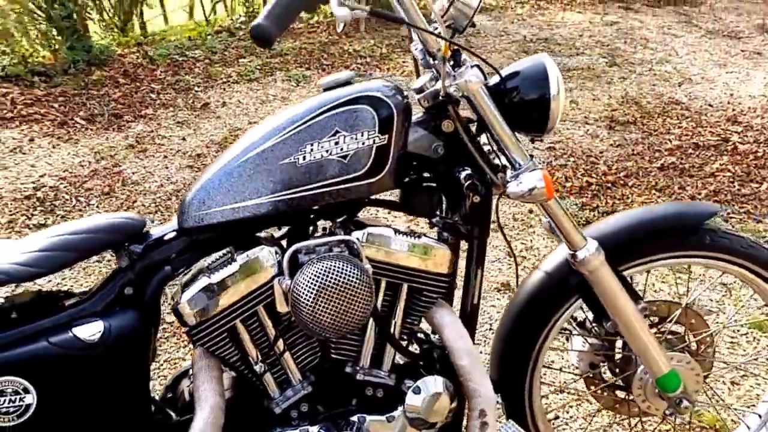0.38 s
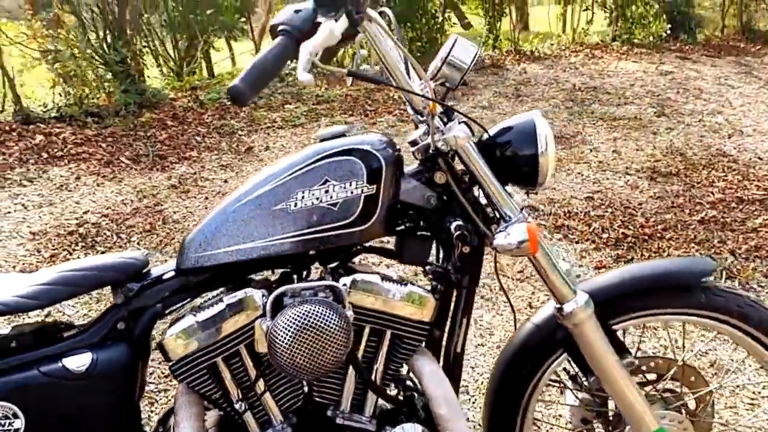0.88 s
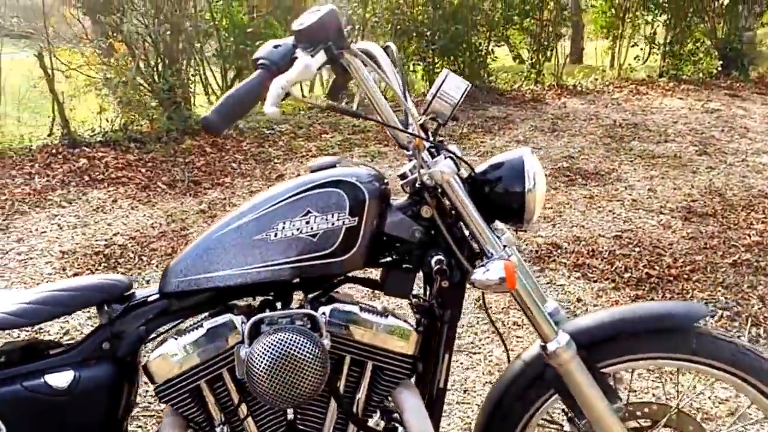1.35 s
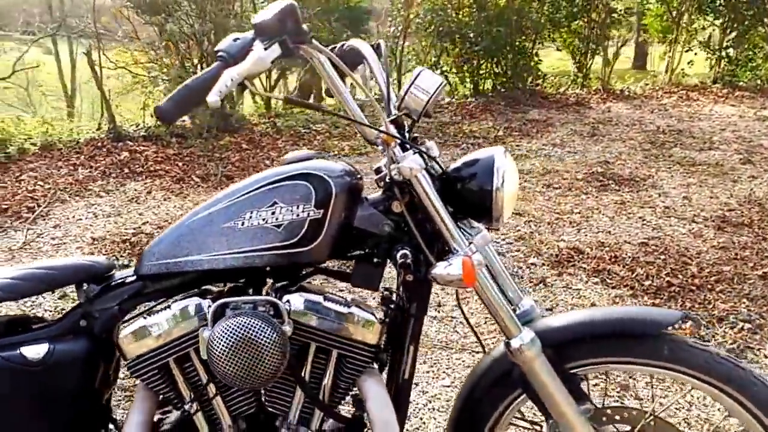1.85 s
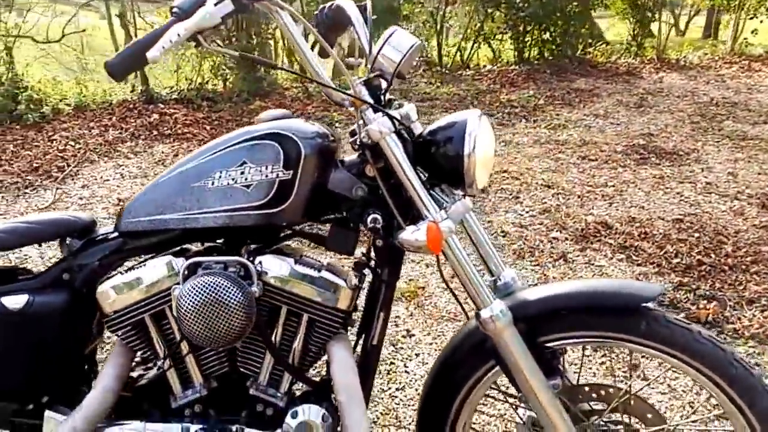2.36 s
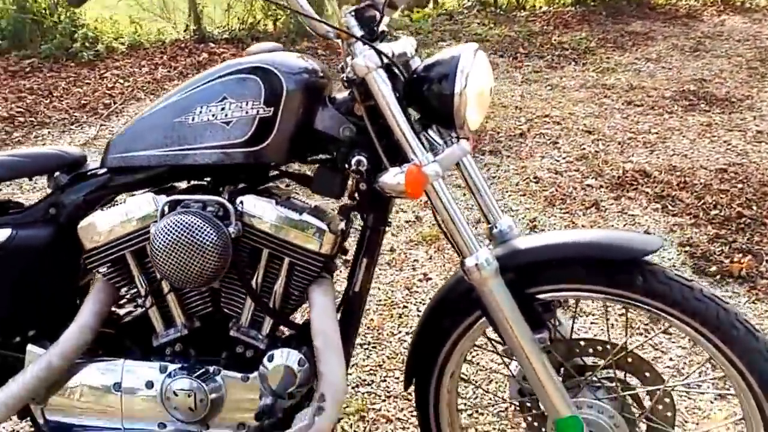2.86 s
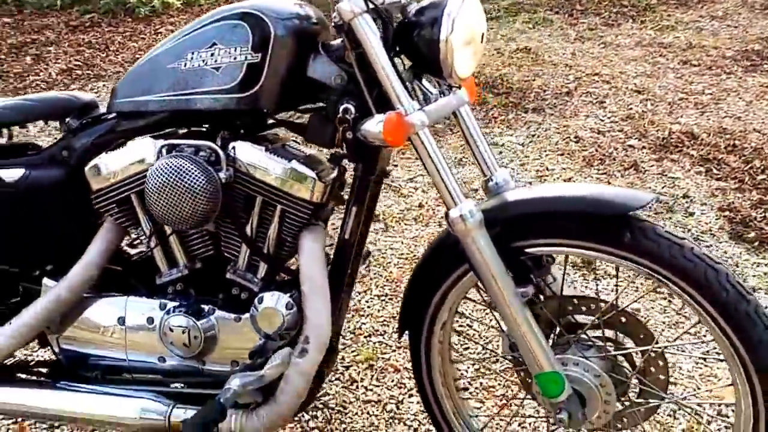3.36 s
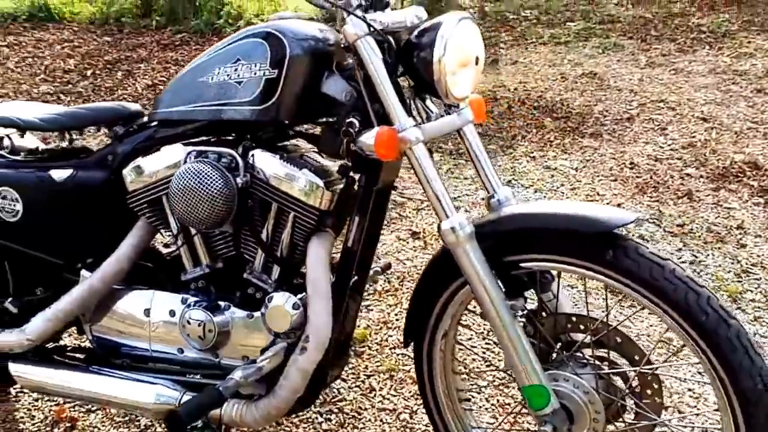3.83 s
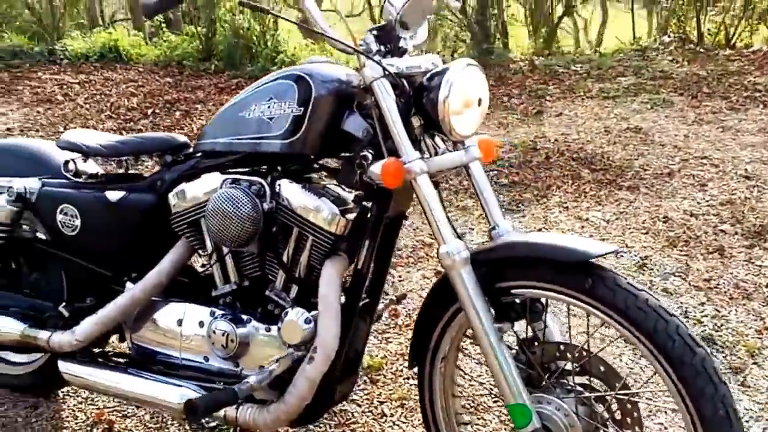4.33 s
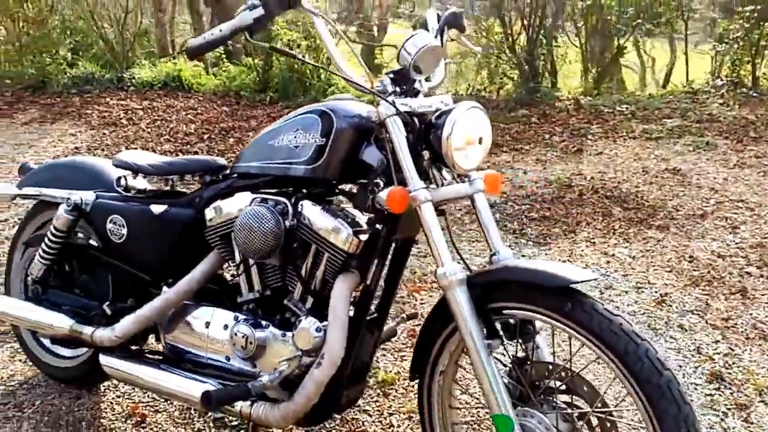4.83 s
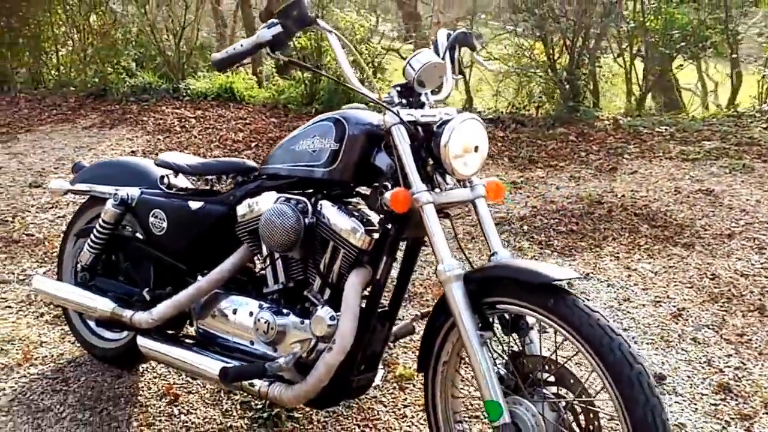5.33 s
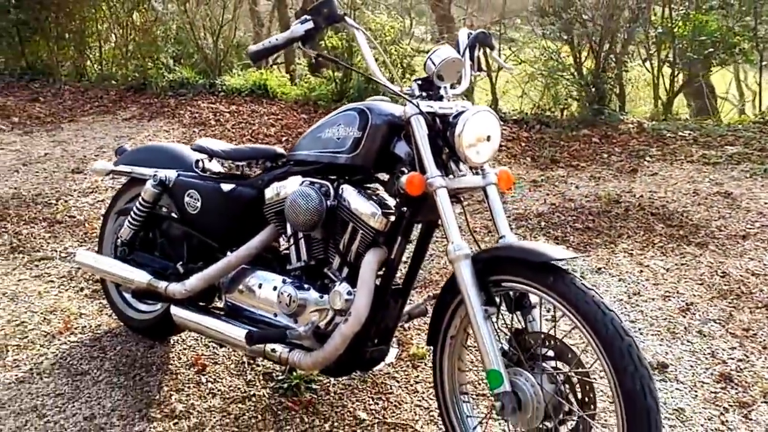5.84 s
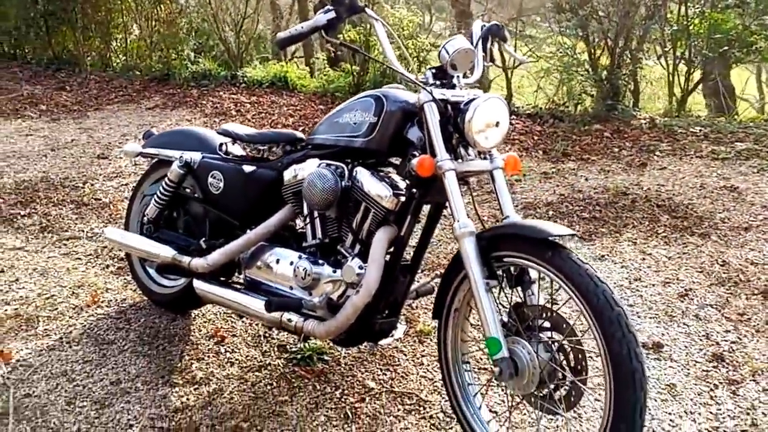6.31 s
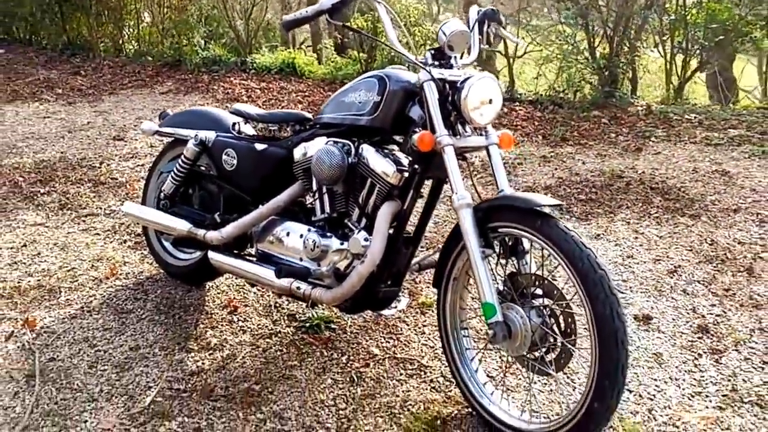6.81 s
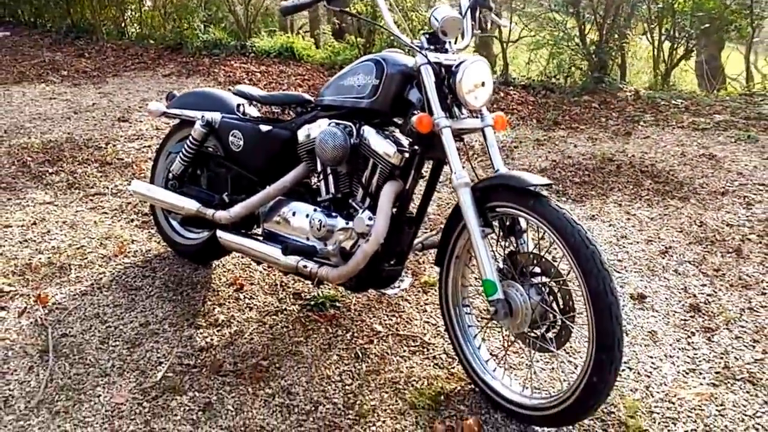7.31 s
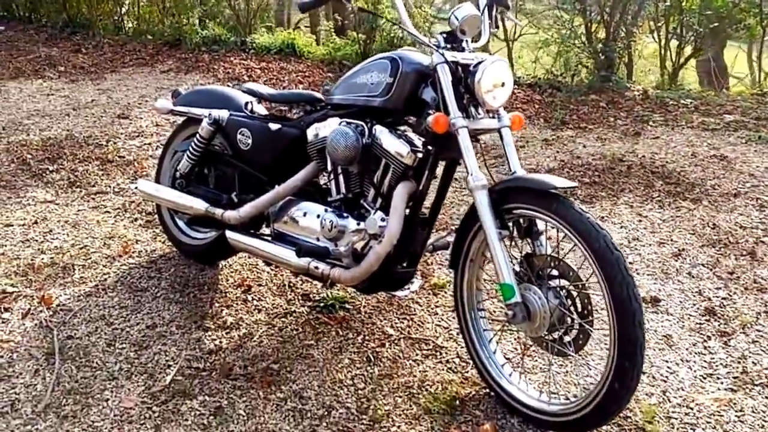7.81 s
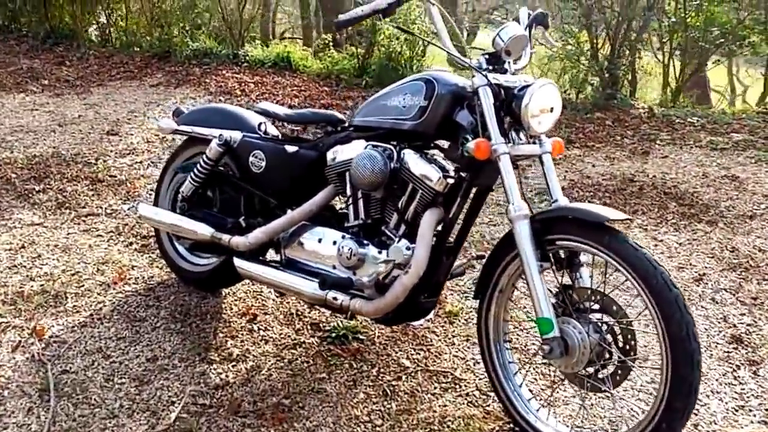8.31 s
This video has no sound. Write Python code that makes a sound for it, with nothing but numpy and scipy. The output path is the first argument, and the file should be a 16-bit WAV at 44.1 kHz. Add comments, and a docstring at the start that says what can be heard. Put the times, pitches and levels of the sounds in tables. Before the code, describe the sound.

Close, loud stereo capture of a motorcycle idling outdoors on open ground. The open exhaust pounds with bassy, uneven thuds, first a strong beat with a weaker one following, later bunching into pairs and small clusters with gaps. Each strong stroke barks and puffs gas; valves thump shut softly. Rattling valve gear and faint hiss fill the gaps. No revving, only a lumpy idle.

```python
"""A big twin-cylinder motorcycle idles lumpily while the listener walks round it.
Every exhaust stroke booms in the open pipes as a set of decaying modes; the stronger ones crack loudest and spit
a jet of noise in short bursts. The valve then shuts with a shorter thump.
Valve gear ticks (struck casing modes) and hisses underneath, and the hedge sends the cracks back as a short
wash of noise. Two ports hear it all with their own colour and arrival."""
import sys
import numpy as np
from scipy import signal
from scipy.fft import rfft, irfft
from scipy.io import wavfile
from scipy.ndimage import uniform_filter1d, map_coordinates

SR = 44100
rng = np.random.default_rng(int(sys.argv[2]) if len(sys.argv) > 2 else 0)


def volts_from_decibels(level):
    """Turn decibel levels (scalar or array-like) into linear amplitude factors."""
    exponent = np.asarray(level, float) / 20
    return 10 ** exponent


def dump_mix(stems):
    """Bounce the given channels to the path in sys.argv[1] as a 16-bit WAV at rate SR."""
    frames = np.atleast_2d(stems).T  # one column per channel
    limited = np.clip(frames, -1, 1)  # hard clip at full scale
    pcm = np.round(limited * 32767).astype(np.int16)
    wavfile.write(sys.argv[1], SR, pcm)


N = 382347


def colour(x, table):
    """Filter by (pitch_hz, level_db) points joined on a log frequency axis."""
    hz, db = np.transpose(table)
    f = np.maximum(np.fft.rfftfreq(x.shape[-1], 1 / SR), 1)
    gain = volts_from_decibels(np.interp(np.log(f), np.log(hz), db))
    return irfft(rfft(x) * gain, x.shape[-1])


def unit(x):
    """Scale to rms 1."""
    return x / np.sqrt(np.mean(x ** 2))


def add(out, s, db, shape):
    """Lay one sound into the track, trimmed at either end."""
    i = int(s * SR)
    part = shape[max(-i, 0):max(N - i, 0)]
    out[max(i, 0):max(i, 0) + len(part)] += volts_from_decibels(db) * part


def swell(times, dbs, rise_s, fall_s):
    """Amplitude envelope of bursts whose powers add where they overlap."""
    u = np.arange(int(min(8 * fall_s, 1) * SR)) / SR
    burst = (1 - np.exp(-u / rise_s)) * np.exp(-u / fall_s)
    power = np.zeros(N)
    for s, db in zip(times, dbs):
        add(power, s, 2 * db, burst ** 2)
    return np.sqrt(power)


def spit(times, dbs, length_s):
    """Amplitude envelope of short rounded bursts."""
    out = np.zeros(N)
    for s, db in zip(times, dbs):
        add(out, s, db, np.hanning(int(length_s * SR)))
    return out


def flicker(rate_hz, db):
    """Gain that wanders by a few dB."""
    k = int(SR / rate_hz)
    steps = np.repeat(rng.standard_normal(N // k + 1), k)[:N]
    return volts_from_decibels(db * unit(uniform_filter1d(steps, k)))


# level of the noise that each channel has to itself, beside the shared noise
# columns: pitch_hz [Hz], level_db [dB]
UNSHARED = [(100, -39), (300, -12.5), (1000, -12), (2600, 3), (3800, 5.5), (6000, 4.5), (15000, 2.5)]


def noise(table):
    """Two channels of coloured noise, alike in the bass and partly apart in the treble."""
    shared = rng.standard_normal(N)
    own = colour(rng.standard_normal((2, N)), UNSHARED)
    return unit(colour(shared + own, table))


# the walk round the motorcycle; ahead_share is the share of the turn to the front
# columns: start_s [s], gear_db [dB], left_lag_us [microseconds], ahead_share [0-1]
WALK_ROUND = [(0, -39.5, 135, 0.29), (1, -41.5, 120, 0.07), (2, -40, 118, 0.37), (2.6, -41.5, 150, 0.37),
              (3.9, -44.5, 238, 0.26), (4.4, -43.5, 172, 0.5), (5.5, -49.5, 149, 0.6),
              (6.5, -45, 118, 0.44), (7.5, -46, 176, 0.83), (8.67, -43.5, 65, 0.8)]


def walk(s):
    """Valve gear level, lag of the left port and share of the turn to the front, gliding along the walk."""
    start_s, *columns = np.transpose(WALK_ROUND)
    return [np.interp(s, start_s, column) for column in columns]


# modes of the engine casing before the scatter of each blow
# columns: pitch_hz [Hz], decay_per_s [1/s]
CASING_MODES = [(620, 193), (690, 150), (970, 142), (1090, 190), (1430, 180), (1580, 400), (1990, 177),
                (2450, 150), (3600, 440), (4900, 1200)]


def knocks(table):
    """Blows on the casing; modes near the struck pitch ring loudest, at slightly different levels in each port."""
    out, u = np.zeros((2, N)), np.arange(SR // 25) / SR
    hz, decay = np.transpose(CASING_MODES)[:, :, None]
    scatter = rng.standard_normal((len(table), 3, len(CASING_MODES), 1))
    for (s, db, pitch), (size_luck, tuning_luck, side_luck) in zip(table, scatter):
        # 22 dB quieter per octave away from the struck pitch
        size = volts_from_decibels(-22 * np.abs(np.log2(hz / pitch)) + 4.02 * size_luck)
        envelope = np.exp(-u * decay) * (1 - np.exp(-u / 0.0022))
        modes = size * envelope * np.sin(2 * np.pi * hz * (1 + 0.051 * tuning_luck) * u)
        for port, sign in zip(out, (1, -1)):
            add(port, s, db, (modes * volts_from_decibels(2 * sign * side_luck)).sum(0))
    return out


# colour of the engine hiss heard from beside the engine, then from ahead of it (relative levels)
# columns: pitch_hz [Hz], level_db [dB per Hz]
HISS_BESIDE = [(210, -21), (350, 6), (464, -3.5), (626, -7.5), (768, -12), (988, 3.5), (1190, -10),
               (1440, 0.5), (3110, -14), (4990, -16.5), (6030, -16), (7000, -17), (7900, -12), (9000, -14),
               (10100, -12.5), (11300, -17), (12500, -12), (14300, -23), (15000, -47)]
HISS_AHEAD = [(210, -23), (350, 3), (410, -1.5), (579, 10), (780, 1), (957, -4), (1230, -5), (3160, -15.5),
              (3940, -15), (5660, -32), (7750, -15.5), (9300, -28.5), (10500, -13.5), (11800, -24.5),
              (13900, -29), (15000, -40)]


def hiss(front):
    """Engine hiss whose colour changes as the listener comes round to the front."""
    return np.sqrt(1 - front) * noise(HISS_BESIDE) + np.sqrt(front) * noise(HISS_AHEAD)


def wash(front, strokes):
    """Hedge returning the cracks: hiss swells just after each stroke, dies slowly and flickers."""
    s, _, _, jet_db = strokes.T
    return swell(s + 0.0062, 0.77 * jet_db - 19.5, 0.011, 0.16) * flicker(60, 3.64) * hiss(front)


def patter():
    """Rockers and chain: a dense, irregular run of small casing knocks, mostly low in pitch."""
    count = 1400
    slip, size, pitch = rng.random((count, 3)).T
    times = (np.arange(count) + slip) * N / SR / count
    return knocks(np.c_[times, 1.5 + 7 * size, 550 * 2 ** (3.1 * pitch ** 1.3)])


def seat_knocks(shuts):
    """Each valve landing on its seat raps the casing, harder after a louder thump, at a scattered pitch."""
    after_s, base_db, pitch_hz, spread_octaves = 0.0073, -31.5, 1280, 0.31
    db, octaves = rng.standard_normal((len(shuts), 2)).T
    level_db = base_db + shuts[:, 1] + 2.5 * db
    return knocks(np.c_[shuts[:, 0] + after_s, level_db, pitch_hz * 2 ** (spread_octaves * octaves)])


# loudest knocks of the valve gear between the seats, levels before the casing modes are weighted
# columns: start_s [s], level_db [dB], pitch_hz [Hz]
LOUD_TICKS = [(.3679, -38, 950), (.6057, -26, 990), (.8996, -20, 620), (2.6837, -24, 1460),
              (2.7473, -24.5, 830), (3.1419, -28, 1060), (3.7919, -20.5, 620), (3.9888, -22.5, 1080),
              (4.4408, -26, 596), (5.2846, -24, 930), (5.9582, -32, 590), (7.6083, -24.5, 970),
              (7.7927, -25, 600), (7.9059, -26, 610), (8.3394, -27.5, 685), (8.4783, -22, 1110)]


def gear(level_db, front, shuts):
    """Valve gear: loud ticks and seat knocks over a patter and a rough hiss that spurts at each valve seat."""
    bed = patter()
    spurt = swell(shuts[:, 0] + 0.0022, 3 + 3 * rng.standard_normal(len(shuts)), 0.00091, 0.042)
    seats = seat_knocks(shuts)
    rough = (flicker(25, 2.9) + spurt) * volts_from_decibels(-6.5) * hiss(front)
    return knocks(LOUD_TICKS) + seats + volts_from_decibels(level_db) * (bed + rough)


# colour of the low flutter (relative levels)
# columns: pitch_hz [Hz], level_db [dB per Hz]
FLUTTER_COLOUR = [(45, -5), (65, 10), (95, 0.5), (150, 2.5), (215, 4), (300, -4.5), (420, -45.5)]


def flutter(strokes):
    """Low noise that swells with each boom."""
    s, boom_db, _, _ = strokes.T
    return swell(s, 1.46 * boom_db - 16, 0.0025, 0.058) * noise(FLUTTER_COLOUR)


# colour of the chuff (relative levels)
# columns: pitch_hz [Hz], level_db [dB per Hz]
CHUFF_COLOUR = [(250, -28), (400, -7), (650, 0.5), (1050, -2), (1600, -5.5), (2500, -17.5)]


def chuff(strokes):
    """Mid-range puff of noise with a fast rise at each stroke."""
    s, _, _, jet_db = strokes.T
    return swell(s, 0.79 * jet_db - 11, 0.0021, 0.036) * noise(CHUFF_COLOUR)


# pitch of the crack as heard along the walk
# columns: start_s [s], pitch_hz [Hz]
CRACK_PITCH = [(0, 724), (1.6, 770), (2.3, 970), (3.4, 1080), (4.6, 1030), (5.5, 780), (7, 740),
               (8.67, 710)]


def cracks(strokes):
    """Each stroke cracks in the casing and raps it twice more within 10 ms, at changing pitches."""
    s, _, _, jet_db = strokes.T
    after, pitch = rng.random((2 * len(s), 2)).T
    rap_hz = 650 * 2 ** (3.0 * pitch ** .9)
    raps = knocks(np.c_[np.repeat(s, 2) + .01 * after, np.repeat(jet_db, 2) + 1.5, rap_hz])
    crack_hz = np.interp(s, *np.transpose(CRACK_PITCH))
    return knocks(np.c_[s + .002, jet_db + 2, crack_hz]) + raps


# colour of the gas jet before the scatter of each stroke (relative levels)
# columns: pitch_hz [Hz], level_db [dB per Hz]
JET_COLOUR = [(410, -20), (700, 3), (1760, -1.5), (3060, -9.5), (4610, -6), (5310, -8), (6110, -4),
              (6690, -9), (10100, -5.5), (13500, -12), (15000, -46)]


def jets(strokes):
    """Gas spat at each valve opening, then a weaker second spit; every stroke colours its bands anew."""
    s, _, _, jet_db = strokes.T
    rush, out = noise(JET_COLOUR), 0
    for hz in 600 * 2 ** np.arange(0, 4.6, .5):
        edges = [hz / 2 ** 0.089, hz * 2 ** 0.39]
        band = signal.sosfilt(signal.butter(2, edges, "band", fs=SR, output="sos"), rush)
        db, late = rng.standard_normal((len(s), 2)).T * [[2.5], [.0006]]  # dB, s
        first = spit(s - .001 + late, jet_db + db + 7.5, .013)
        second = spit(s + 0.0079 + late, jet_db - db - 3, 0.008)
        out = out + band * (first + second)
    return out


def ring(modes, detune=0.95, damped=False):
    """Modes that swell and die after a push; when damped they are stifled from 33 ms onward."""
    damp_from_s, damp_s = 0.033, 0.017
    u = np.arange(SR // 8) / SR
    y = 0
    for hz, decay, size, rise in modes:
        y = y + size * np.exp(-u * decay) * (1 - np.exp(-u * rise)) * np.sin(2 * np.pi * hz * detune * u)
    return y * np.exp(-(np.maximum(u - damp_from_s, 0) / damp_s) ** 2) if damped else y


# pipe modes excited by the shutting valve, pitches before ring() tunes them by 0.95
# columns: pitch_hz [Hz], decay_per_s [1/s], size [signed amplitude], rise_per_s [1/s]
SHUT_MODES = [(105.3, 70.8, 0.8, 41), (212.7, 130.5, 0.78, 23)]


def thumps(shuts):
    """Each shutting valve pushes the pipe air into a short thump."""
    out = np.zeros(N)
    for s, db in shuts:
        add(out, s, db, ring(SHUT_MODES))
    return out


# pipe modes of the boom (pitches before the tuning by 0.95), the bark and the pressure front
# (pitches before the scatter of each stroke)
# columns: pitch_hz [Hz], decay_per_s [1/s], size [signed amplitude], rise_per_s [1/s]
BOOM_MODES = [(66.7, 39, 1, 60.5), (92.1, 19.6, -1.25, 60), (115.4, 26.7, -0.65, 18.5)]
BARK_MODES = [(204.5, 101.7, -1.315, 72.7), (316, 51, -0.06, 27000)]
FRONT_MODES = [(210, 450, .42, 3000), (900, 420, .16, 4000)]
# colour of the deepest boom beside the engine and ahead of it
# columns: pitch_hz [Hz], level_db [dB]
DEEP_BESIDE = [(28, 0), (40, 5), (55, 0)]
DEEP_AHEAD_OF = [(28, -15), (40, -35), (55, -0.5)]


def pipes(front, strokes, shuts):
    """Boom, bark and earlier pressure front of each stroke in the open pipes, with the valve thumps."""
    front_lead_s = 0.002846
    out = thumps(shuts)
    tunings = 1 + rng.standard_normal((len(strokes), 2)) * [.015, .06]
    for (s, boom_db, bark_db, _), (bark_tuning, front_tuning) in zip(strokes, tunings):
        add(out, s, boom_db, ring(BOOM_MODES, damped=True))
        add(out, s, bark_db, ring(BARK_MODES, bark_tuning))
        add(out, s - front_lead_s, bark_db, ring(FRONT_MODES, front_tuning))
    return (1 - front) * colour(out, DEEP_BESIDE) + front * colour(out, DEEP_AHEAD_OF)


# the stronger exhaust strokes: those that fired and a few that only pumped air, rear cylinder first;
# the last row only ends the final gap
# columns: start_s [valve opens, s], boom_db [dB], bark_db [dB], jet_db [dB], open_s [valve stays open, s]
STRONG_STROKES = [(-.135, 4, 0, -22.5, .045), (0.103, -8, -8, -36.5, .052), (.205, 1, 5, -19.5, .0486),
                  (0.4362, -4.5, -3.5, -28.5, .0452), (.529, 0, 2, -19, .0525),
                  (0.7775, -11.5, -12.5, -45, .055), (0.8851, 1, 1.5, -20.5, .0514),
                  (.949, -4.5, -16, -30.5, .0443), (1.214, 0, 1, -21.5, .0417),
                  (1.456, -2.5, -8, -25, .0473), (1.5501, 1, 1.5, -18, .049),
                  (1.7865, -4.5, -15, -28, .0472), (1.8822, 0.5, 3, -19.5, .04),
                  (2.119, -5, -25, -28, .0496), (2.2195, -1.5, 2.5, -21, .0413),
                  (2.455, -9.5, -14, -53, .0513), (2.555, -0.5, -5, -24.5, .0453),
                  (2.7958, -1, -1.5, -24, .0457), (2.8885, 0.5, -0.5, -23.5, .044),
                  (3.1394, -4.5, -9, -36.5, .0508), (3.2441, .5, 2.5, -22, .0434),
                  (3.4843, -4.5, -8.5, -31.5, .0504), (3.5832, 1.5, 3.5, -20, .0446),
                  (3.8206, -4, -6.5, -28.5, .0461), (3.9134, .5, 2, -20.5, .0409),
                  (4.2637, -1, -2.5, -22.5, .0422), (4.3292, -0.5, 0.5, -25.5, .0404),
                  (4.4183, -7, -12, -41, .0357), (4.5816, 0, 1.5, -23.5, .0424),
                  (4.829, -.5, -3.5, -23, .0425), (4.9121, 0.5, -2, -22.5, .0396),
                  (4.9877, -7.5, -16, -39.5, .0354), (5.2587, 0.5, -1.5, -25.5, .0419),
                  (5.325, -0.5, -3.5, -22.5, .0425), (5.587, -1.5, -6, -25, .0465),
                  (5.7619, -3.5, -5, -28, .0458), (5.8347, -1, -4.5, -24.5, .0426),
                  (6.1001, -4.5, -14, -31.5, .0428), (6.2613, -3.5, -10, -32, .0574),
                  (6.3316, -2, -11, -25, .0415), (6.4154, -3.5, -20, -30.5, .0423),
                  (6.4915, -9, -34, -43, .0493), (6.7774, -3.5, -7, -29.5, .0553),
                  (6.8476, 0.5, 1.5, -22.5, .0395), (7.1001, -4, 0, -25.5, .0534),
                  (7.3403, -4, -3.5, -30, .0535), (7.4256, -1.5, -2.5, -27, .0395),
                  (7.7653, -1, 1, -25.5, .0535), (7.835, 1, -0.5, -24, .04), (7.992, -7, -30, -42.5, 0.041),
                  (8.0787, -1, -6.5, -29.5, .0534), (8.322, 1, -1.5, -25.5, .0529),
                  (8.4056, 1, -2.5, -27.5, .0394), (8.4779, -5.5, -30, -48, .0431), (8.74, 0, 0, -25, .045)]


def crank():
    """All strokes (s, boom, bark, jet dB) and valve shuts (s, dB); crank angle places the pumping strokes between."""
    # pairs are (rear, front) cylinder; crank_deg is the turn from that cylinder's stroke to the next
    stroke_s, crank_deg = .084, (315, 405)
    coasting = .15  # the crank slows between the stronger strokes (share of the gap)
    # the strokes between only pump air: the boom sags with each one, the bark lies under the boom
    pump_boom_db, pump_open_s = (-11, -11), (0.04, .043)
    pump_sag_db, pump_bark_db, pump_jet_db, pump_jet_ahead_db = -4, -13, -48.5, -4.5
    pump_scatter_db = (2, 12, 5)  # boom, bark, jet
    # thump: dB after a 0 dB boom, dB per dB of boom, dB per ms open beyond the mean, dB gained ahead
    shut_db, shut_follow, shut_db_per_ms, shut_ahead_db = (2.5, 6), 0.41, -0.07, 1.5
    rows, cylinder = [], 0
    for strong, (then, *_) in zip(STRONG_STROKES, STRONG_STROKES[1:]):
        gap_s = then - strong[0]
        turn = (cylinder + np.arange(round(gap_s / stroke_s) + 1)) % 2
        angle = np.cumsum(np.take(crank_deg, turn[:-1]))
        share = angle / angle[-1]
        times = strong[0] + gap_s * (share - coasting * share * (1 - share))
        rows.append((*strong, cylinder))
        for k, (s, c) in enumerate(zip(times[:-1], turn[1:])):
            boom, bark, jet = rng.standard_normal(3) * pump_scatter_db
            boom += pump_boom_db[c] + k * pump_sag_db
            bark += boom + pump_bark_db
            jet += pump_jet_db + walk(s)[-1] * pump_jet_ahead_db
            rows.append((s, boom, bark, jet, pump_open_s[c], c))
        cylinder = turn[-1]
    s, boom, _, _, open_s, c = np.transpose(rows)
    thump = np.take(shut_db, c.astype(int)) + shut_follow * boom
    thump = thump + shut_db_per_ms * (open_s - open_s.mean()) * 1000
    thump = thump + shut_ahead_db * walk(s)[-1]
    return np.array(rows)[:, :-2], np.c_[s + open_s, thump]


# colour difference between the ports, beside the engine and ahead of it
# columns: pitch_hz [Hz], left_minus_right_db [dB]
PORTS_BESIDE = [(60, -1), (110, -0.5), (200, 0.5), (380, -1.5), (700, -2.5), (1290, 3.5), (2380, 5),
                (4400, 12), (8120, -0.5), (15000, -7.5)]
PORTS_AHEAD_OF = [(60, -1.0), (110, -1.0), (200, -4), (380, 3.5), (700, -6.5), (1290, 4.5), (2380, -4),
                  (4400, 2.5), (8120, -12), (15000, -4)]


def two_ports(left, right, lag_us, front):
    """The left port hears the sound later; each takes half of the colour difference, with opposite signs."""
    late = np.arange(N) - lag_us * 1e-6 * SR
    left = map_coordinates(left, [late], order=3, mode="nearest")
    beside, ahead = [
        np.array([colour(x, np.array(table) * [1, half]) for x, half in ((left, .5), (right, -.5))])
        for table in (PORTS_BESIDE, PORTS_AHEAD_OF)]
    return (1 - front) * beside + front * ahead


def scene():
    """Wash, valve gear, gas and pipes reach two ports whose colour and arrival change along the walk."""
    gear_db, lag_us, front = walk(np.arange(N) / SR)
    strokes, shuts = crank()
    background = wash(front, strokes) + gear(gear_db, front, shuts)
    gas = flutter(strokes) + chuff(strokes) + cracks(strokes) + jets(strokes)
    left, right = background + gas + pipes(front, strokes, shuts)
    return two_ports(left, right, lag_us, front)


def band_limit(x):
    """A steep low-pass at the top of the band."""
    return signal.sosfilt(signal.butter(12, 15590, fs=SR, output="sos"), x)


def record(dry):
    """The loudest booms are rounded off near full scale; the deepest bass and the top are cut."""
    x = dry / (1 + np.abs(dry / 1.25) ** 4) ** .25
    x = signal.sosfilt(signal.butter(1, 18, "high", fs=SR, output="sos"), x)
    x = signal.sosfilt(signal.ellip(10, .2, 60, 14300, fs=SR, output="sos"), x)
    return band_limit(np.clip(x, -1, 1))


dry = scene()
out = record(dry)
dump_mix(out)
```